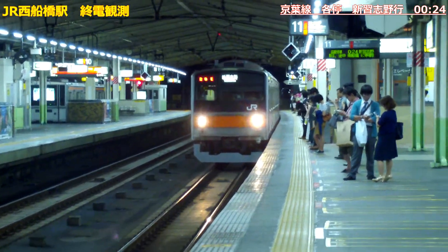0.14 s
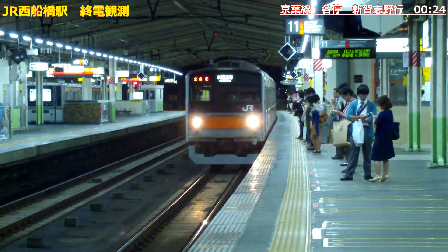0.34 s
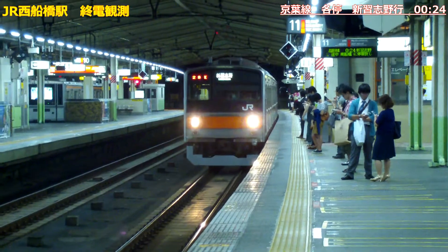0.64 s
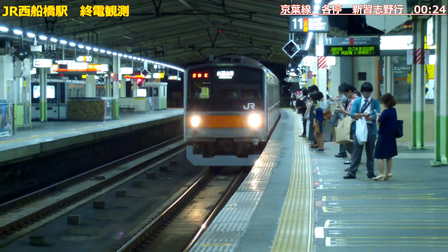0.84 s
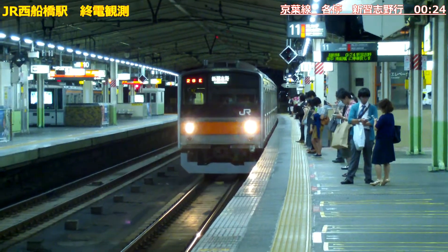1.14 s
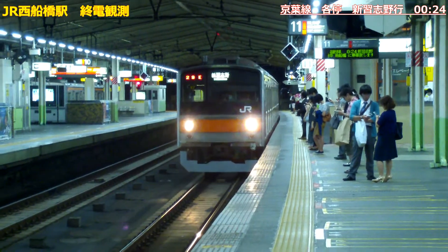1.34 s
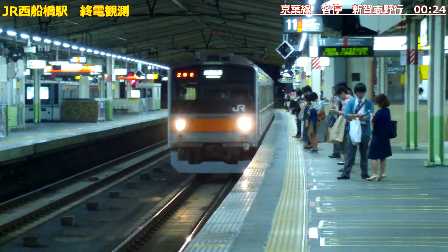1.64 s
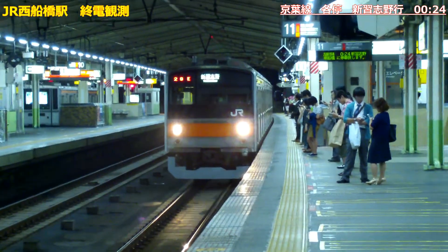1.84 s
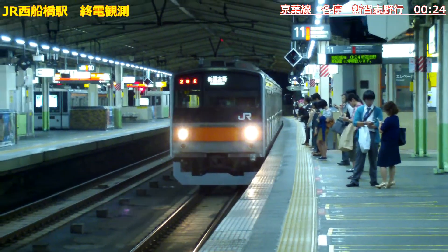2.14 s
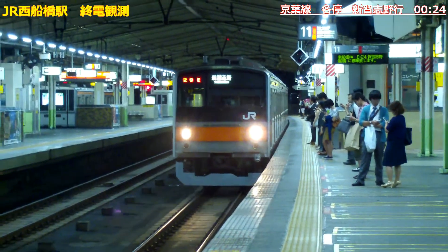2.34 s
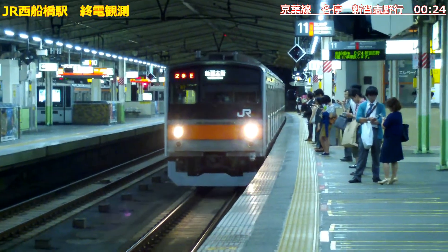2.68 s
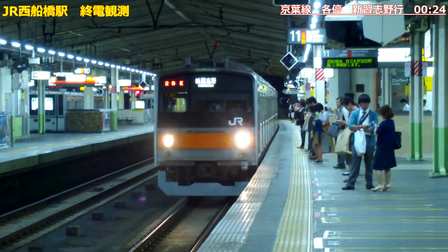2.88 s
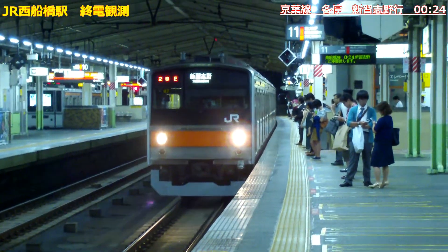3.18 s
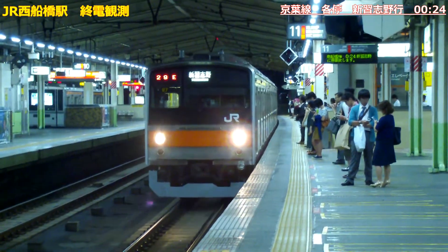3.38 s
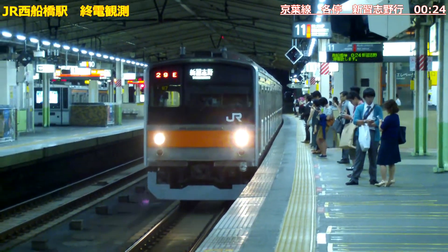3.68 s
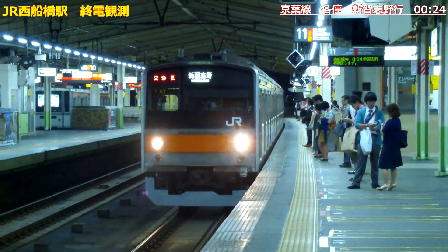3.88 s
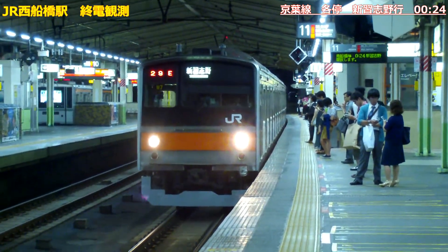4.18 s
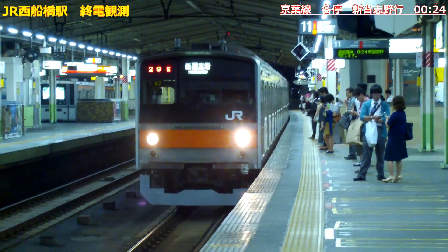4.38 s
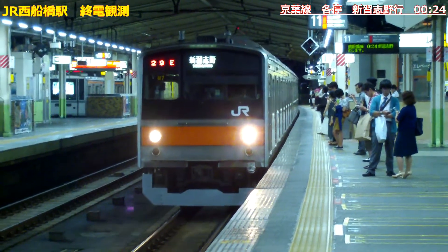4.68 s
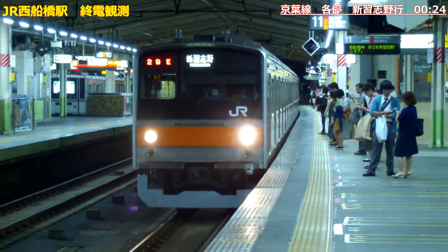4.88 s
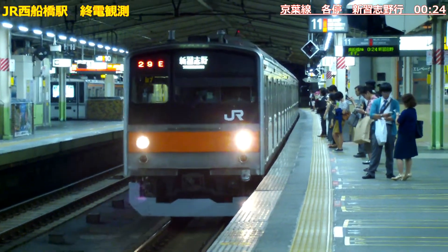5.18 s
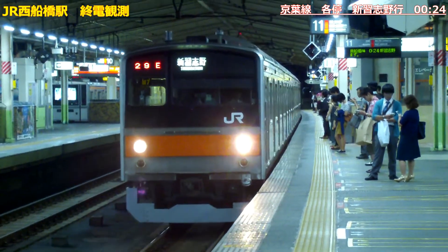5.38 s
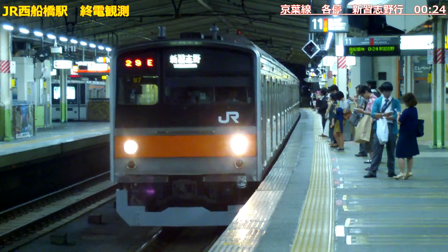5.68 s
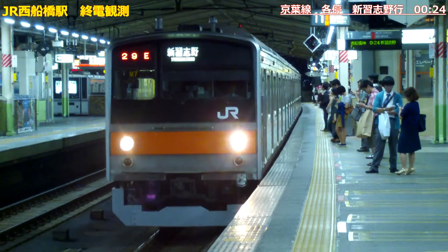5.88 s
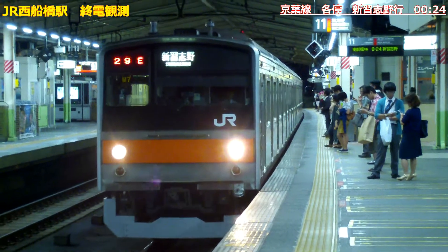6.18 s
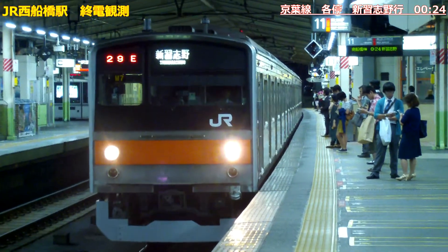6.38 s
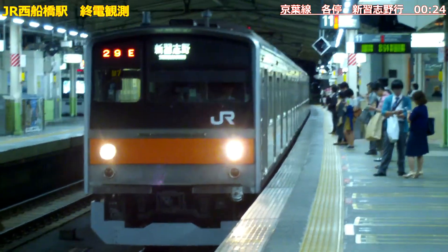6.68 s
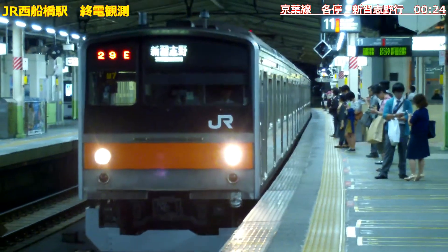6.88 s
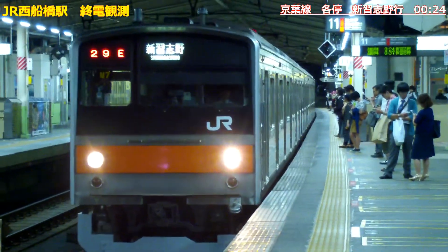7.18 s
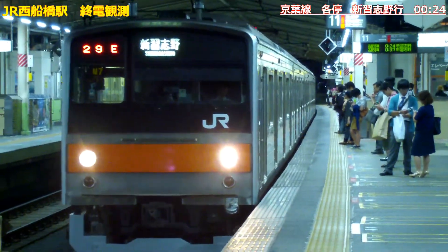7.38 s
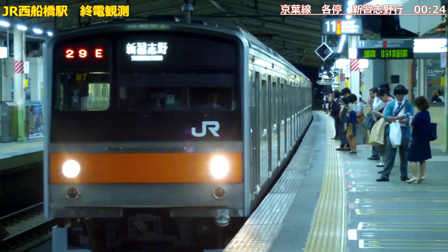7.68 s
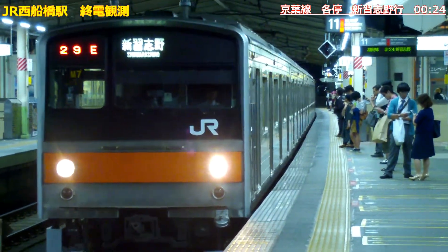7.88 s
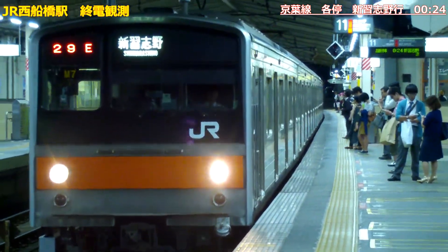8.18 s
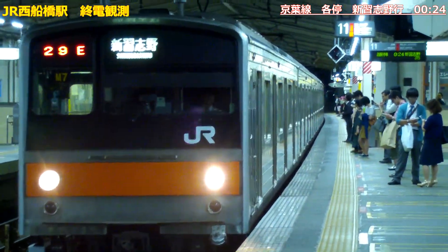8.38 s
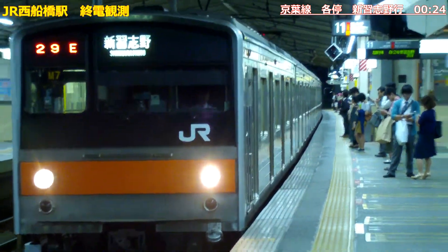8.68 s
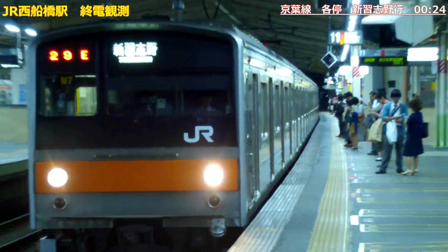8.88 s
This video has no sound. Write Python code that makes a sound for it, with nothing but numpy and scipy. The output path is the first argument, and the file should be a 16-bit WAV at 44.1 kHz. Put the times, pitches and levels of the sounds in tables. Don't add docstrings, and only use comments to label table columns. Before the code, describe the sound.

An electric train slows toward the listener under an echoing platform roof. Rolling rumble, mid-range rush and hiss grow gradually, mixed with buzzing inverter whine and a faint sinking motor hum. Draughts thump and crackle on the cheap camera microphone, briefly choking the sound. Later the wind eases somewhat and several piercing metallic brake squeals pile up, pushing the rolling noise back.

```python
import sys
import numpy as np
from scipy import signal
from scipy.fft import rfft, irfft, next_fast_len
from scipy.io import wavfile
from scipy.ndimage import uniform_filter1d

SR = 44100
rng = np.random.default_rng(int(sys.argv[2]) if len(sys.argv) > 2 else 0)


def volts(x):
    e = np.asarray(x, float) / 20
    return 10 ** e


def master(y):
    cut = np.clip(np.atleast_2d(y).T, -1, 1)
    pcm = np.round(cut * 32767)
    wavfile.write(sys.argv[1], SR, pcm.astype(np.int16))


N = 398223
TIME = np.arange(N) / SR

# time_s, pitch_hz, level_db, octave_db, purity (0-1)
FADING_SQUEAL = [
    (0.0, 5145, -18.5, -29, 0.042),
    (0.464, 5120, -32, -34, 0.046),
    (0.962, 5070, -56, -17, 0.05),
    (1.0, 5150, -50, -21, 0.05),
]
# time_s, loudness_db
TRAIN_LOUDNESS = [(0.0, -0.5), (0.6, -2.5), (1.8, 0.46), (3.0, 1), (4.1, 2.5), (6.0, 2), (6.8, 2.5), (7.25, 3),
                  (8.1, 3.5), (8.55, 1.5), (9.03, 5)]
# frequency_hz, density_db (per Hz)
ROLLING_SPECTRUM = [(18, -58), (30, -19), (115, -17.5), (394, -11), (499, -14.5), (801, -9.5), (1860, -8.5),
                    (2120, -5.5), (2540, -8), (3140, -8), (6900, -9), (10200, -26), (16000, -36)]
# pitch_hz, width_hz
INVERTER_BANDS = [(2128, 34), (3165, 55), (4225, 55), (4540, 40), (5750, 40), (8500, 30), (810, 60)]
INVERTER_BAND_DB = [2.5, -2.5, -1.5, -7, -11, -15.5, -4.5]
# time_s, strength_db
WIND = [(0.0, -1), (.35, -1), (.6, -4), (1.0, 2), (2.5, 0), (3.05, -3), (3.9, 0), (4.2, -3.5), (4.55, -4.5),
        (4.8, 0), (5.2, -5), (6.3, -2), (6.9, -2.5), (7.6, -2.5), (8.1, 0), (8.5, -3.5), (9.03, .5)]
# start_s, peak_db, centre_hz
POPS = [(0.2176, -16.5, 700), (0.5668, -16, 660), (0.6434, -15.5, 780), (1.124, -11, 1100),
        (1.2751, -13.5, 745), (1.382, -13.5, 790), (1.651, -5, 1160), (1.7037, -12.5, 855),
        (1.9701, -16, 706), (2.3111, -6, 1020), (2.3429, -2, 1486), (2.4651, -10.5, 710), (2.746, -12, 720),
        (2.8133, -10.5, 890), (3.595, -29, 764), (3.863, -13, 1000), (3.8865, -21, 790), (4.0086, -13, 734),
        (4.8269, -17, 620), (4.973, -29, 775), (5.948, -21.5, 696), (6.101, -22, 373), (6.569, -17, 850),
        (7.04, -17, 483), (8.0823, -13.5, 1080), (8.2112, -13.5, 675), (8.299, -20.5, 455),
        (8.7719, -11.5, 950), (8.849, -24, 609), (8.979, -6.5, 1043)]
# start_s, length_s, peak_db, centre_hz
FLURRIES = [(0.2507, 0.0057, -10, 950), (0.274, 0.0075, -1.5, 1010), (0.2984, 0.016, -9, 830),
            (1.0185, .018, -6, 925), (1.186, 0.036, -15.5, 850), (1.397, 0.023, -17, 880),
            (1.439, .015, -7.5, 1000), (2.0285, 0.0039, -10.5, 750), (2.2495, 0.0091, -8.5, 870),
            (2.4172, 0.0096, -1.5, 1060), (2.431, 0.0036, -2.5, 960), (2.5657, 0.0027, -4, 860),
            (2.577, 0.01, -3.5, 990), (2.6105, 0.0066, -4.5, 1087), (2.625, 0.0027, -16, 930),
            (2.8867, 0.0056, 0, 1310), (2.9015, 0.0026, -8, 1040), (2.9146, 0.0018, -1.5, 1280),
            (2.951, 0.012, -7, 870), (3.236, 0.0026, -12.5, 903), (3.309, 0.0086, -3.5, 890),
            (3.326, .004, -0.5, 1260), (3.3486, 0.0043, -12, 990), (4.6928, 0.0089, -3.5, 870),
            (4.797, 0.0035, -13.5, 674), (7.1278, 0.0047, -4.5, 1079), (7.193, 0.0085, -11.5, 790),
            (7.9818, 0.0099, -6, 1050), (8.0342, .013, -8.5, 1070), (8.948, 0.0022, -9.5, 800)]
# start_s, length_s
CHOKES = [
    (.2869, .0097),
    (2.331, .0052),
    (2.381, .011),
    (2.8942, .0052),
    (2.9316, .0035),
    (2.9605, .0042),
    (3.3205, .002),
]
# start_s, hold_s, pitch_hz, level_db, glide_hz_per_s
MOTOR_LINE = [
    (2.1, 0.62, 366, -50, -3.5),
    (2.9, 0.62, 353, -48, -4),
    (4.852, .6, 379, -54, -10.5),
    (5.447, 0.44, 372.6, -47.5, -24),
    (5.807, 1, 306.5, -52.5, -4),
]
# full_s (time of full strength), hold_s, pitch_hz, level_db, glide_hz_per_s
SQUEALS = [(5.402, 0.062, 5490, -9.5, -150), (6.134, 0.89, 5500, -8.5, -17), (6.189, 0.29, 5157, -22, -29),
           (6.7, 0.25, 5140, -25.5, 10), (6.956, 0.094, 5954, -22, -16), (7.173, 0.084, 5420, -14, -300),
           (7.292, 0.27, 5320, -15, -450), (7.192, 0.083, 5134, -21.5, -29), (7.589, .17, 5175, -10, -200),
           (7.635, 0.044, 5920, -17.5, -46), (7.76, 0.23, 5550, -12.5, -150), (7.82, 0.45, 5196, -17.5, 59),
           (7.906, 0.36, 5950, -26, 7), (8.551, 0.17, 5950, -24.5, -53), (8.018, 0.23, 5430, -17.5, 6),
           (8.116, 0.054, 4754, -15, 5), (8.279, 0.48, 5500, -9, -50.5), (8.416, 0.25, 5285, -15, 7),
           (8.552, 0.35, 4796, -23, -48.5), (8.86, 0.081, 5530, -16, 16), (8.877, .2, 5946, -15, -200),
           (8.895, 0.18, 5270, -24.5, 6)]
# start_s, hold_s, fade_s, pitch_hz, width_hz
BRIEF_MODES = [(7.72, .24, .05, 4495, 32), (8.12, .2, .15, 5770, 30), (7.87, .13, .04, 3425, 15),
               (7.7, .7, .3, 6200, 80), (8.53, .15, .2, 6160, 25), (5.45, .12, .1, 2740, 15),
               (6.7, .3, .05, 2750, 12), (7.95, .3, .05, 3830, 30), (8.08, .2, .08, 4960, 60),
               (8.06, .2, .08, 9920, 70), (7.65, .15, .05, 7480, 40), (8.15, .15, .04, 11600, 15),
               (8.5, .5, .1, 5000, 60)]
BRIEF_MODE_DB = [-22, -17, -32, -33, -26, -34.5, -39.5, -37, -18, -30.5, -36, -48, -27]
# frequency_hz, density_db (per Hz)
AMPLIFIER_HUM = [(20, 14), (100, -13), (400, -37), (20000, -36)]
# frequency_hz, density_db (per Hz)
CONVERTER_HISS = [(20, 1), (300, 2), (2000, -5), (6000, -3), (13000, 3.5), (20000, 3.5)]

RUMBLE_DB, ROLL_DB, HISS_DB, INVERTER_DB = -42, -38, -44.5, -38
RUMBLE_SHARE, ROLL_SHARE, HISS_SHARE, INVERTER_SHARE = -0.16, 0.57, 1.8, 1.17
RUMBLE_PER_GUST = 1.26
LAMP_HZ, LAMP_DB = 8284, -54

ECHO_HZ, FADING_ECHO_HZ, DIRECT_HZ, SKIRT_HZ, SKIRT_DB = 46, 115, 8, 160, -10
CATCH_DB_PER_S, CATCH_GAIN_PER_S, RELEASE_DB_PER_S, SILENT_DB = 225, 250, 45, -46
PURITY, PURITY_PER_S, OCTAVE_DB, OCTAVE_DB_PER_S, OCTAVE_TAIL_DB = 0.14, 0.091, -37, 5, -25

GUST_S, GUST_LAG_S, GUST_FLOOR_DB, GUST_RISE_DB, GUST_PER_WIND = 0.03, 0.005, -36, 9, 0.5
FLURRY_GAP_S, FLURRY_SCATTER_DB, FLURRY_OCTAVES = 0.0042, 11, 0.55
LARGEST_ODDS = 0.03
DUCK_FROM_DB, DUCK_SLOPE, DUCK_S = -12.5, 0.97, 0.11


def curve(table):
    s, *columns = np.transpose(table)
    since_start = TIME - s[0] + (s[0] == 0)
    until_end = s[-1] - TIME + (s[-1] > 9)
    gate = np.clip(np.minimum(since_start, until_end) * 25, 0, 1)
    return gate, *(np.interp(TIME, s, column) for column in columns)


def unit(x):
    return x / np.sqrt(np.mean(np.abs(x) ** 2))


def flutter(width_hz, skirt=2, size=N):
    count = next_fast_len(size // 64 + 2)
    hz = np.fft.fftfreq(count, 64 / SR)
    phase = 2j * np.pi * rng.random(count)
    spectrum = np.exp(phase - .5 * np.abs(hz / width_hz) ** skirt) * rng.rayleigh(size=count)
    slow = np.fft.ifft(spectrum)
    return unit(np.interp(np.arange(size), 64 * np.arange(count), slow))


def coloured(spectrum, lo_hz=1, hi_hz=SR, order=2):
    size = next_fast_len(N)
    hz = np.fft.rfftfreq(size, 1 / SR) + 1
    point_hz, point_db = np.array(spectrum).T
    gain = volts(np.interp(np.log(hz), np.log(point_hz), point_db))
    gain = gain / np.sqrt((1 + (lo_hz / hz) ** (2 * order)) * (1 + (hz / hi_hz) ** (2 * order)))
    return unit(irfft(gain * rfft(rng.standard_normal(size)))[:N])


def turning(hz, size=N):
    return np.exp(2j * np.pi * np.cumsum(hz * np.ones(size)) / SR)


def squeal(table, echo_hz=ECHO_HZ):
    gate, *columns = curve(table)
    on = gate > 0
    hz, db, octave_db, purity = (column[on] for column in columns)
    size, purity = len(hz), np.clip(purity, 0, 1)
    pointer = turning(hz, size)
    direct = flutter(DIRECT_HZ, size=size)
    direct = direct / (np.abs(direct) + .01) ** .7
    first = np.sqrt(purity) * direct + np.sqrt(1 - purity) * flutter(echo_hz, 1.6, size)
    first = first + volts(SKIRT_DB) * flutter(SKIRT_HZ, size=size)
    octave = np.sqrt(purity) * flutter(25.2, size=size) + np.sqrt(1 - purity) * flutter(120, size=size)
    tone = first * pointer + volts(octave_db + 1.0) * octave * pointer ** 2
    gate[on] *= np.sqrt(2) * volts(db) * tone.real
    return gate


def rolling_noise(near_db):
    gust_db = 10 * RUMBLE_PER_GUST * uniform_filter1d(gust(), size=5000)
    rumble_db = RUMBLE_DB + RUMBLE_SHARE * near_db + curve(WIND)[1] + gust_db
    roll_db = ROLL_DB + ROLL_SHARE * near_db
    hiss_db = HISS_DB + HISS_SHARE * near_db
    out = volts(rumble_db - 1.5 + 2.4 * flutter(5.4).real) * coloured(ROLLING_SPECTRUM, hi_hz=564)
    out += volts(roll_db + 3.5 + 0.7 * flutter(5.7).real) * coloured(ROLLING_SPECTRUM, lo_hz=560, hi_hz=2760)
    out += volts(hiss_db + 7.5 + 1.0 * flutter(7.6).real) * coloured(ROLLING_SPECTRUM, lo_hz=2800)
    return out


def lamp():
    return volts(LAMP_DB + 5.5 + 2.9 * flutter(11).real) * turning(LAMP_HZ).real


def inverter(near_db):
    whine_db = INVERTER_DB + INVERTER_SHARE * near_db
    out = np.zeros(N)
    for (hz, width_hz), db in zip(INVERTER_BANDS, INVERTER_BAND_DB):
        out += volts(whine_db + db) * (flutter(width_hz, 1.18) * turning(hz)).real
    return out


def gust():
    coarse = TIME[::256]
    halo = sum(volts(row[-2] / 2) * np.exp(-((coarse - row[0] - GUST_LAG_S) / GUST_S) ** 2)
               for row in POPS + FLURRIES)
    return np.repeat(np.tanh(0.8 * halo), 256)[:N]


def slaps():
    rows = list(POPS)
    for (s, length, db, hz), chance in zip(FLURRIES, rng.random((len(FLURRIES), 8, 3))):
        count = min(int(length / FLURRY_GAP_S) + 2, 8)
        late, weak, pitch = chance[:count].T
        place = np.linspace(0, 1, count)
        place[1:-1] += (late[1:-1] - .5) / count
        pop_db = db - FLURRY_SCATTER_DB * (weak - weak.min())
        pop_hz = hz * 2 ** (FLURRY_OCTAVES * (pitch - weak))
        rows += zip(s + length * place, pop_db, pop_hz)
    return rows


def add_pop(out, s, db, hz, skew, turns_wide):
    turns = np.arange(-150, 150) / SR * hz
    pop = volts(db) * np.sin(2 * np.pi * turns + skew) * np.exp(-(turns / turns_wide) ** 2)
    at = int(s * SR) + np.arange(300)
    inside = (at >= 150) & (at < N + 150)
    out[at[inside] - 150] += pop[inside]


def draught():
    out = np.zeros(N)
    for (s, db, hz), skew in zip(slaps(), rng.standard_normal(250)):
        add_pop(out, s, db + 1.4, 0.89 * hz, 0.89 * skew, .55)
        add_pop(out, s, 1.2 * db - 11 + 16 * np.log2(hz / 1000), 2.1 * hz, skew, .45)
    gust_db = GUST_FLOOR_DB + GUST_RISE_DB * gust() + GUST_PER_WIND * curve(WIND)[1]
    for when, size, pitch, skew in rng.random((3000, 4)):
        level_db = gust_db[int(when * N)]
        excess_db = level_db + 37.5
        if excess_db > 0:
            onset_db = 10 * np.log10(1.001 - volts(-2 * excess_db))
            pop_db = level_db + onset_db + 2.7 - 4.7 * np.log(size + LARGEST_ODDS)
            add_pop(out, when * N / SR, pop_db, 380 * 2 ** (1.7 * pitch), 2 * np.pi * skew, .55)
    return out


def membrane_passing():
    passing = np.ones(N)
    for s, length in CHOKES:
        passing *= np.clip(np.abs(TIME - s - length / 2) * 4000 - length * 2000, .01, 1)
    return passing


def motor():
    out = np.zeros(N)
    for s, hold, hz, db, glide in MOTOR_LINE:
        gate, pitch_hz = curve([(s, hz), (s + hold, hz + glide * hold)])
        out += np.sqrt(2) * gate * volts(db + 0.54 * flutter(4.6).real) * turning(pitch_hz).real
    return out


def wheel_mode(s, hold, hz, db, glide):
    catch = CATCH_DB_PER_S + CATCH_GAIN_PER_S * max(s - 6.2, 0)
    swing_db = db - SILENT_DB
    times = np.array([s - swing_db / catch, s, s + hold, s + hold + swing_db / RELEASE_DB_PER_S])
    pitch_hz = hz + glide * np.minimum(times - s, hold + 0.146)
    octave_db = OCTAVE_DB + OCTAVE_DB_PER_S * (times - 6) + [8, 0, 0, OCTAVE_TAIL_DB]
    purity = (PURITY + PURITY_PER_S * (times - 6)) * [2, 1.4, 0.45, 0.67]
    return np.transpose([times, pitch_hz, [SILENT_DB, db, db, SILENT_DB], octave_db, purity])


def brief_modes():
    out = np.zeros(N)
    for (s, hold, fade, hz, width_hz), db in zip(BRIEF_MODES, BRIEF_MODE_DB):
        on = (TIME > s) & (TIME < s + hold + 6 * fade)
        age = TIME[on] - s
        shape = np.clip(age * 30, 0, 1) * np.exp(-np.clip(age - hold, 0, None) / fade)
        out[on] += volts(db) * shape * (flutter(width_hz, size=len(age)) * turning(hz, len(age))).real
    return out


def brakes():
    out = squeal(FADING_SQUEAL, FADING_ECHO_HZ)
    out += sum(squeal(wheel_mode(*row)) for row in SQUEALS)
    return out + brief_modes()


def ducking(squeals):
    keep = np.exp(-1 / (DUCK_S * SR))
    loud_db = 10 * np.log10(signal.lfilter([1 - keep], [1, -keep], squeals ** 2) + 1e-9)
    return volts(-DUCK_SLOPE * np.clip(loud_db - DUCK_FROM_DB, 0, None))


def scene():
    squeals = brakes()
    near_db = curve(TRAIN_LOUDNESS)[1]
    train = rolling_noise(near_db) + lamp() + inverter(near_db) + motor()
    passing = membrane_passing()
    heard = (squeals + ducking(squeals) * train) * passing
    low_cut = signal.butter(2, 200, "high", fs=SR, output="sos")
    mono = heard + signal.sosfilt(low_cut, draught() * passing)
    return np.array([mono, mono])


def low_pass(x):
    return signal.sosfilt(signal.butter(12, 17080, fs=SR, output="sos"), x)


def record(dry):
    dip = signal.lfilter(*signal.iirnotch(7930, 22, fs=SR), dry)
    heard = .1 * dry + .9 * dip
    heard = heard / (1 + np.abs(heard / 1.015) ** 6) ** (1 / 6)
    heard = signal.sosfilt(signal.butter(2, 90, "high", fs=SR, output="sos"), heard)
    slope = np.abs(uniform_filter1d(np.abs(np.gradient(heard[0])), size=90))
    hiss = np.array([coloured(CONVERTER_HISS), coloured(CONVERTER_HISS)])
    heard = heard + volts(-21 + 3.4 * flutter(45).real) * (slope + 3e-4) ** 0.92 * hiss
    heard = heard + volts(-63) * np.array([coloured(AMPLIFIER_HUM), coloured(AMPLIFIER_HUM)])
    heard = signal.sosfilt(signal.ellip(8, .2, 40, 15750, fs=SR, output="sos"), heard)
    finished = np.clip(heard, -1, 1)
    return low_pass(finished)


dry = scene()
out = record(dry)
master(out)
```